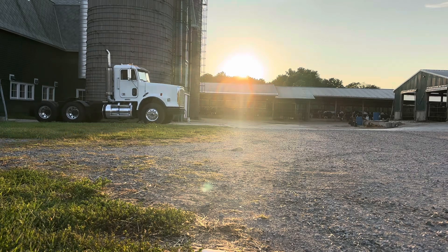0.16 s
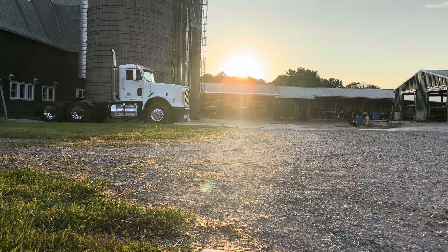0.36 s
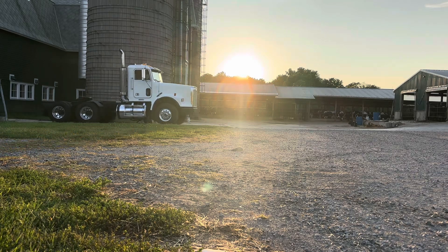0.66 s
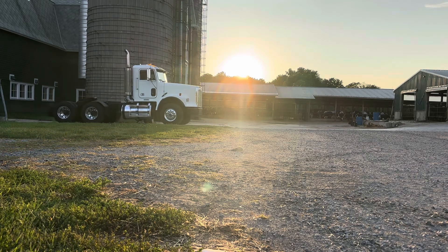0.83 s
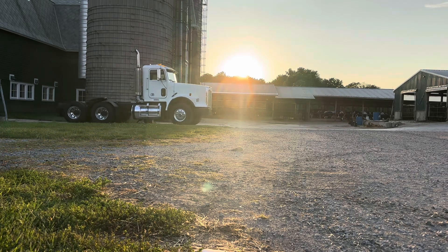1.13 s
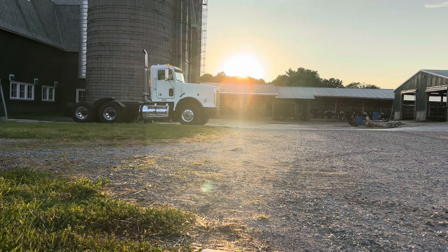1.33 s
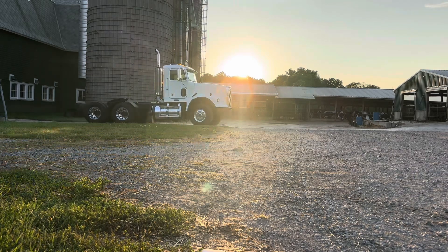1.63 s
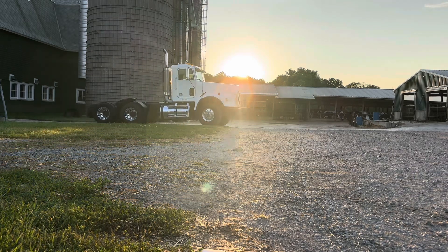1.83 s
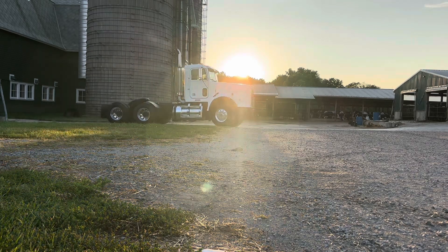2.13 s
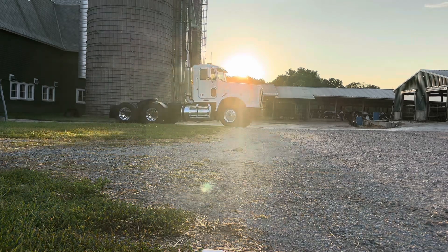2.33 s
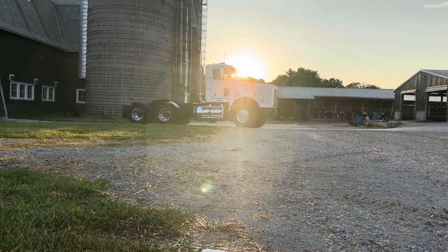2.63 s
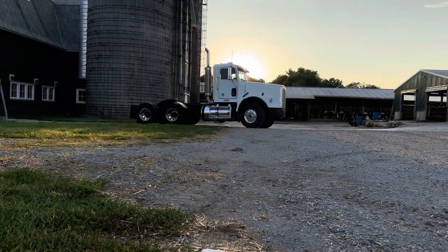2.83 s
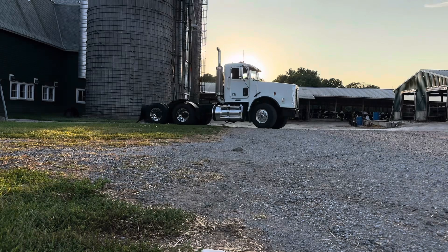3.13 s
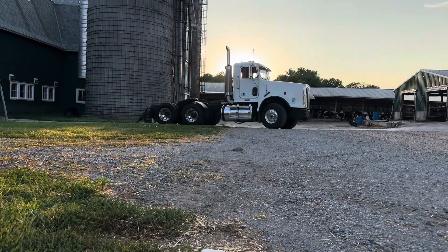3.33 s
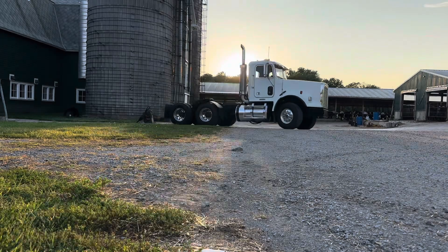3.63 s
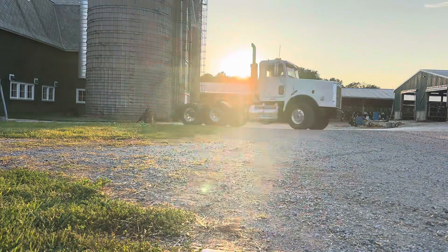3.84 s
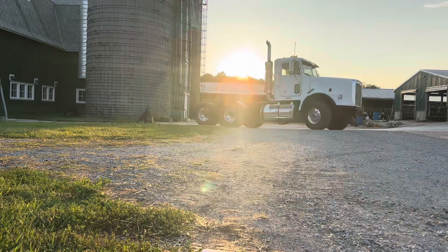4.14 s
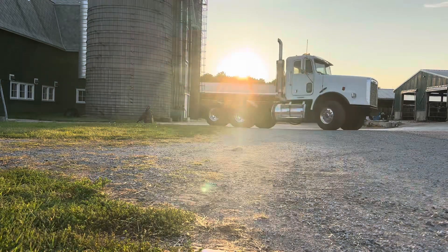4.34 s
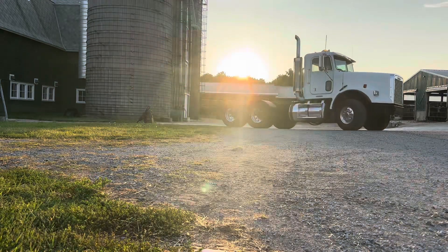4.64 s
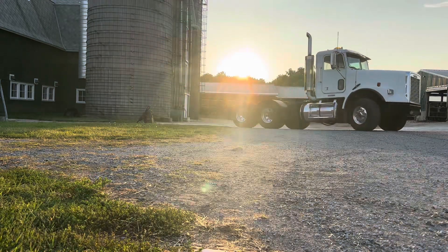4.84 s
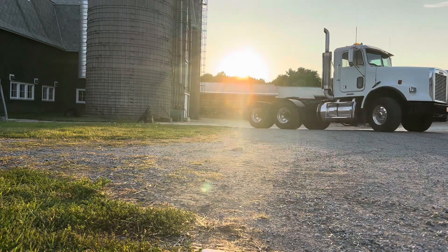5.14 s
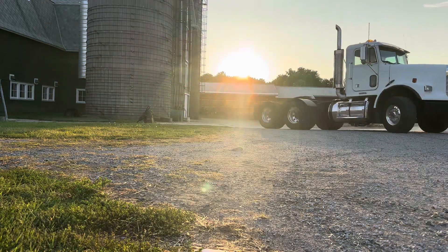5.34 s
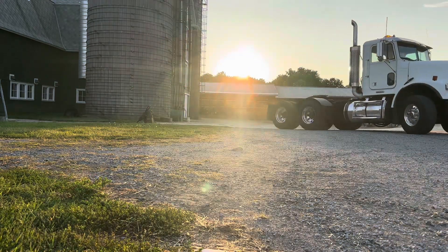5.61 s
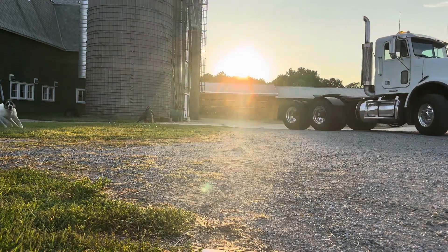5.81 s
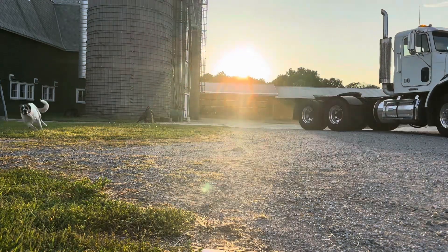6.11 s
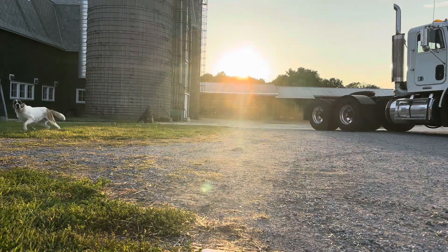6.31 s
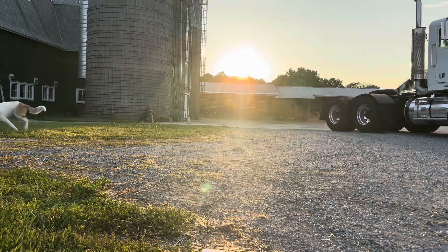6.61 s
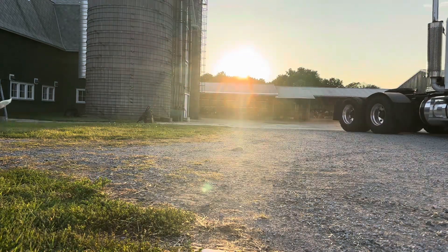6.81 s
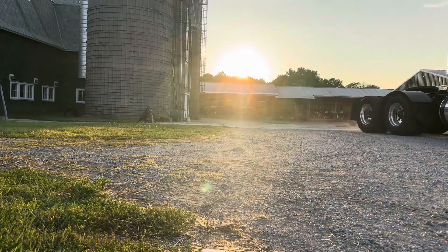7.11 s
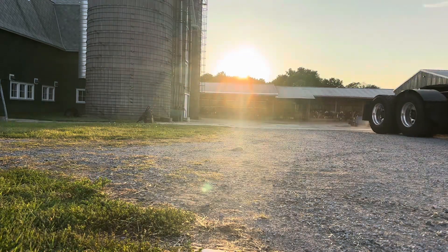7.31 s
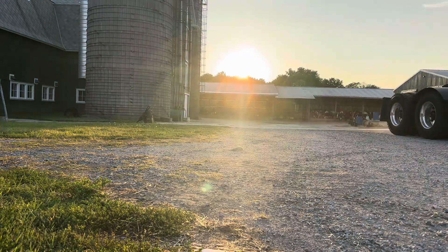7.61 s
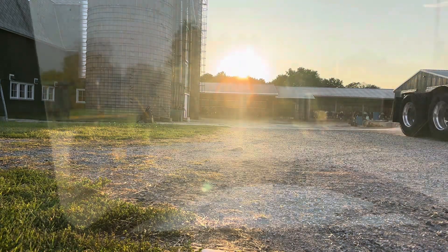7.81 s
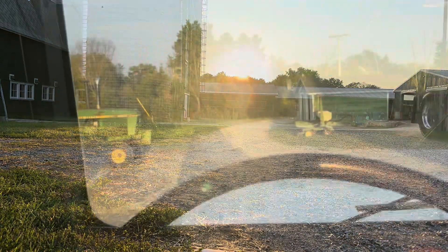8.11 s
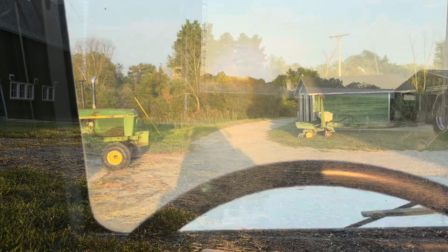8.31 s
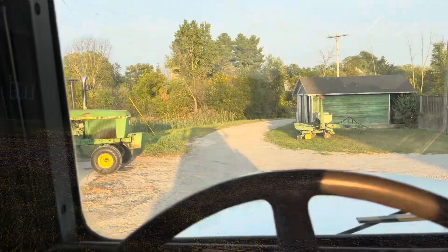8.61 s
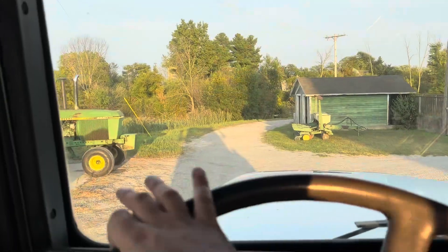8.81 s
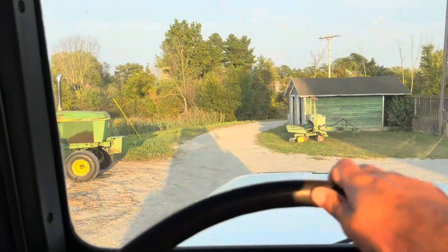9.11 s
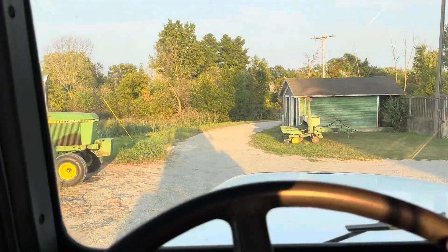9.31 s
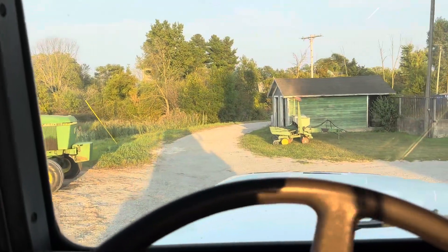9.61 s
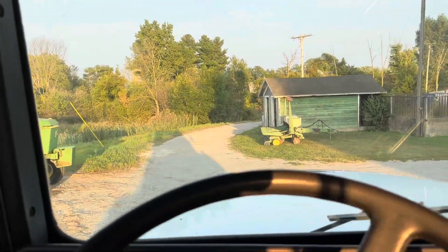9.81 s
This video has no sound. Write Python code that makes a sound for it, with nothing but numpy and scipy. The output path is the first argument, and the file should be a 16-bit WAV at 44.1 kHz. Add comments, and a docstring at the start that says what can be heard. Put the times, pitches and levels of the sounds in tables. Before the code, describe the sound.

A diesel truck accelerates across gravel between barns, engine clattering and exhaust ringing. Around two seconds it coasts briefly for a shift, the turbo whining downward, then power returns louder and the engine settles to a steady drone. Near eight seconds the yard blends into the muffled, boomy cab interior, where a linkage clacks, air hisses more strongly on the left, and the engine lopes before picking up speed. Two closely spaced microphones.

```python
"""A six-cylinder diesel truck pulls away across a gravel farmyard from left to right, changes gear once and
rolls on. The yard fades into the cab of the idling truck, where air hisses and the engine then picks up speed.
The engine is firing tones plus eight bands of noise, part of which repeats every engine cycle.
Whistles, ringing clacks and filtered hisses join it; two microphones a hand apart hear it,
with lag, level difference and decaying-noise echoes from barn walls and cab panels."""
import sys
import numpy as np
from scipy import signal
from scipy.fft import rfft, irfft, next_fast_len
from scipy.io import wavfile
from scipy.ndimage import uniform_filter1d, map_coordinates

SR = 44100
rng = np.random.default_rng(int(sys.argv[2]) if len(sys.argv) > 2 else 0)


def unload_audio(sound):
    """Save the sound as a 16-bit wav file, at the path given as the first command line argument."""
    columns = np.transpose(np.atleast_2d(sound))
    # keep every value between -1 and 1, then stretch to whole-number steps
    steps = np.round(np.clip(columns, -1, 1) * 32767)
    wavfile.write(sys.argv[1], SR, steps.astype(np.int16))


N = 438794
CYLINDERS = 6

# The eight shaken parts, low to high, are always listed in this order:
# rumble, exhaust bark, stack ring, block knock, valve clatter, rattle, rasp, hiss.

# engine speed heard from the yard: t/s, firing rate/Hz
YARD_SPEED_CURVE = [(0, 42), (.36, 44), (.84, 50.6), (1.17, 62.5), (1.46, 69), (1.82, 77.5), (1.92, 70.2),
                    (2.2, 59.9), (2.64, 42.2), (2.92, 51.9), (3.11, 57.9), (3.27, 58.6), (3.66, 67.1),
                    (4.09, 78), (4.55, 70.6), (4.81, 71), (5.2, 68.7), (5.96, 67.7), (6.82, 67.8),
                    (7.78, 70), (8.5, 71)]


def amp(db):
    """Turn decibels into a gain."""
    return 10 ** (np.asarray(db) / 20)


def rms_one(x):
    """Scale a sound so that its rms (average strength) is 1."""
    return x / np.sqrt(np.mean(x ** 2) + 1e-20)


def in_time(rows, span):
    """Draw straight lines between the rows of a table, giving each column a value at every sample of a span."""
    s, *columns = np.transpose(rows)
    return [np.interp(np.arange(*span) / SR, s, c) for c in columns]


def band(x, low_hz, high_hz, order=3):
    """Keep only the pitches between two edges (Butterworth band-pass)."""
    return signal.sosfilt(signal.butter(order, [low_hz, high_hz], "band", fs=SR, output="sos"), x)


def flicker(count, spread_db):
    """A gain that wanders randomly, mostly 1 to 19 times a second."""
    return amp(spread_db * rms_one(band(rng.standard_normal(count), 1.24, 19.0, order=2)))


def coloured(x, spectrum, modes):
    """Shape a sound with a smooth spectrum that has resonance peaks on top."""
    size = next_fast_len(x.shape[-1] + SR // 10)
    hz = np.maximum(np.arange(size // 2 + 1) * SR / size, 1)
    curve_hz, curve_db = np.array(spectrum).T
    db = np.interp(np.log(hz), np.log(curve_hz), curve_db)
    for top_hz, width, lift_db in modes:
        db = db + lift_db / (1 + (2 * (hz - top_hz) / width) ** 2)
    return irfft(rfft(x, size) * amp(db), size)[..., :x.shape[-1]]


def delayed(x, ms):
    """Play x later by a delay that may slide, reading between samples."""
    return map_coordinates(x, [np.arange(len(x)) - ms * SR / 1000], order=3, mode="nearest")


def cycle_pattern(cycles, life, line_db, size=4096):
    """Pressure that returns every engine cycle: steady lines, and a random part renewed over `life` cycles."""
    # multiples of the engine-cycle rate that have steady lines
    line_orders = [9, 10, 14, 16, 17, 20, 24, 33, 35, 39, 42, 48, 52, 57, 53, 64, 66, 72, 75, 78, 84, 87,
                   58, 61, 55, 62, 69]
    stroke_top_order = 24   # lines up to this multiple join in one hard stroke
    stroke_lead = .22       # share of a firing by which that stroke comes ahead of the first cylinder

    # random patterns without those lines; each blends into the next
    spectra = np.sqrt(size) * np.exp(2j * np.pi * rng.random((64, size // 2 + 1)))
    spectra[:, line_orders] = 0
    patterns = irfft(spectra)
    age = cycles / life
    old, turn = age.astype(int), np.pi / 2 * (age % 1)

    orders = np.array(line_orders)
    stroke_turns = .5 + orders * stroke_lead / CYLINDERS
    turns = np.where(orders <= stroke_top_order, stroke_turns, rng.random(len(orders)))
    lines = np.zeros(size // 2 + 1, complex)
    lines[line_orders] = np.sqrt(size) * amp(line_db) * np.exp(2j * np.pi * turns)

    at = (cycles % 1 * size).astype(int)
    fading = np.cos(turn) * patterns[old % 64, at]
    coming = np.sin(turn) * patterns[(old + 1) % 64, at]
    return irfft(lines)[at] + fading + coming


def engine(firing_hz, tone_db, part_db, flutter_db, repeat, colour, modes, line_db, life):
    """Each firing sounds tones at multiples of its rate and shakes eight parts, returned one to a row."""
    # edges between neighbouring parts: f/Hz
    part_edges = [30, 240, 520, 780, 1150, 2200, 3400, 5800, 17000]
    # how deeply each part swells with every firing: 0-1
    part_throb = [.1, .15, .2, .24, .24, .2, .16, .05]
    # no two cylinders hit alike: level/dB of each
    cylinder_db = [2, -1, 0, 1.5, -2, -.5]
    roughening = 6.0      # Hz per s; a change of speed this fast roughens the cycles halfway
    pull_flutter_db = 2.2   # extra wavering of the tones while the speed changes
    rev_repeat = .75      # share of the pattern that survives any change of speed

    pull = uniform_filter1d(np.gradient(firing_hz) * SR, round(.3 * SR))   # Hz per s
    steady = 1 / (1 + (pull / roughening) ** 2)
    flutter_db = flutter_db + pull_flutter_db * (1 - steady)
    firings = np.cumsum(firing_hz) / SR

    hum = 0
    for k, db in enumerate(tone_db):
        tone = np.sin(2 * np.pi * (k + 1) * firings + 1.03 * k)
        hum = hum + np.sqrt(2) * amp(db) * flicker(len(db), flutter_db) * tone

    pattern = cycle_pattern(firings / CYLINDERS, life, line_db)
    noise = rng.standard_normal(len(hum))
    alike, chance = coloured(np.array([pattern, noise]), colour, modes)

    strength = amp(cylinder_db)[firings.astype(int) % CYLINDERS]
    blow = strength * np.exp(-2.5 * (firings % 1))
    blow = uniform_filter1d(blow, round(SR / 400))   # pressure builds over a few ms
    blow = blow / blow.mean() - 1

    rows = []
    for k, db in enumerate(part_db):
        share = np.clip(repeat[k], 0, 1)
        if k > 0:   # the rumble keeps its pattern at any change of speed
            share = share * (rev_repeat + (1 - rev_repeat) * steady)
        mix = (np.sqrt(share) * alike + np.sqrt(1 - share) * chance) * (1 + part_throb[k] * blow)
        sos = signal.butter(2, part_edges[k:k + 2], "band", fs=SR, output="sos")
        rows.append(amp(db) * rms_one(signal.sosfiltfilt(sos, mix)))
    return hum, rows


def yard_engine(span):
    """Tones grow with speed and drop while the fuel is cut; each part blends five loudness curves."""
    # loudness curves, of which only the swing about the mean counts:
    # t/s, then level/dB of low mids, mids, high mids, low treble, treble
    yard_levels = [(0, -46.5, -45, -51.5, -58.5, -77), (.45, -42.5, -37.5, -46, -56, -70),
                   (1.07, -33, -37, -36.5, -52.5, -50.5), (1.5, -34, -31.5, -35.5, -47.5, -50),
                   (1.815, -27.5, -33, -36.5, -53, -48.5), (1.86, -32.5, -40.5, -53.5, -61.5, -65.5),
                   (2.1, -35.5, -45, -50.5, -59, -61.5), (2.582, -39, -53.5, -62.5, -67, -78.5),
                   (2.589, -43.5, -31, -49, -58, -74), (2.82, -41.5, -28, -44, -61.5, -69),
                   (2.98, -33, -25, -36, -56, -54), (3.72, -32.5, -21.5, -33.5, -50, -52.5),
                   (4.14, -31, -23.5, -30, -42, -46), (4.37, -29.5, -25.5, -37.5, -44.5, -54),
                   (4.42, -33.5, -26, -42, -48, -59), (5.33, -31.5, -23.5, -38.5, -46.5, -55),
                   (6.14, -29, -20.5, -31.5, -48, -44.5), (6.76, -30.5, -20.5, -32, -38.5, -43.5),
                   (7.81, -33, -23.5, -31, -31.5, -46), (8.3, -34.5, -21, -29.5, -31, -46)]
    # firing tone, its 2nd and 3rd multiple: level/dB at cruise, slope/dB per Hz, share of the low mids' swing
    tone_rules = [(-24, 0.35, 0.21), (-20, 0.28, 0.45), (-30, 0.45, 1)]
    # each part: mean level/dB, then its share of the swing of each of the five loudness curves
    part_rules = [(-28, 1, 0.0074, 0.19, 0.14, -0.47), (-30, 0.64, 0, 0.23, 0.25, -0.17),
                  (-28, 0.29, 0.73, -0.5, 0.15, 0.28), (-32, 0.16, 0.98, 0.34, 0.15, -0.28),
                  (-34.5, 0.37, 0.13, 0.88, 0.11, -0.45), (-41.5, 0.1, 0, -0.067, 0.022, 0.31),
                  (-47.5, 0.093, 0.12, -0.031, 0.83, -0.17), (-51, 0, 0.097, -0.25, 0.06, 0.5)]
    # the exhaust pipe favours some pitches: f/Hz, level/dB
    pipe = [(42, 1.5), (58, 4), (75, -2), (85, 0.5), (98, -5.5), (115, -5), (130, -2), (145, -2.5),
            (156, -8.5), (175, -6), (190, 1.5), (205, 3), (230, -2.5)]
    # change in level of the 3rd multiple, strongest near 3.7 s: t/s, level/dB
    third_tone = [(0, -4), (1.3, -1), (1.8, -5), (2.7, -3), (3.7, 1), (4.4, -1.5), (6, -1.5), (8.3, -6)]
    # drop of each tone while the fuel is cut: level/dB
    coast_loss = [15, 18, 14]
    # share of each part that comes back alike in every engine cycle: 0-1
    yard_repeat = [.85, .85, .9, .9, .4, .15, .08, 0]
    # balance of pitches within each part: f/Hz, level/dB per Hz
    yard_colour = [(30, -18.5), (60, -8.5), (130, -4), (220, -7), (310, -19.5), (600, -19), (950, -15),
                   (1150, -22), (1800, -30), (2400, -45), (4500, -45.5), (7000, -59), (10000, -60.5),
                   (13000, -67.5)]
    # resonances of the exhaust stack, then others heard in the yard: f/Hz, width/Hz, level/dB
    stack_modes = [(410, 70, 9), (646, 20, 10.5), (755, 19, -3), (890, 34, 5), (970, 38, 8), (1080, 24, 3)]
    yard_modes = [(323, 71, 0.5), (1660, 84, 3.5), (2320, 570, 6), (2937, 85, 2), (3600, 430, 4.5),
                  (4880, 1600, 5.5), (5890, 870, 6), (7680, 1600, 4.5)]
    # steady lines against their neighbours: level/dB
    yard_line_db = [3.2, 5.8, 1.1, 11.9, 1, 2.9, 10.1, 2.4, 6.5, 8.8, 10.2, 4.6, 5.5, 7.4, 3.1, 9.2, 11,
                    7.3, 9.8, 9.6, 6.6, 2.4, 8.1, 6, 2.2, 2.4, 7.4]
    fuel_off_s, fuel_on_s, fuel_edge_s = 1.8, 2.62, 0.026   # the gear change
    cruise_hz = 68       # firing rate
    coast_repeat = .3    # share of the repeating pattern left while the fuel is cut

    firing_hz, = in_time(YARD_SPEED_CURVE, span)
    levels = np.array(in_time(yard_levels, span))
    swing = levels - levels.mean(axis=1, keepdims=True)
    fuel_cut = [(fuel_off_s, 0), (fuel_off_s + fuel_edge_s, 1), (fuel_on_s, 1), (fuel_on_s + fuel_edge_s, 0)]
    coasting, = in_time(fuel_cut, span)

    tone_db = []
    for k, (db, slope, share) in enumerate(tone_rules):
        level = db + slope * (firing_hz - cruise_hz) + share * swing[0] - coast_loss[k] * coasting
        tone_db.append(level + np.interp((k + 1) * firing_hz, *np.transpose(pipe)))
    tone_db[2] = tone_db[2] + in_time(third_tone, span)[0]

    part_db = [db + np.dot(shares, swing) for db, *shares in part_rules]
    repeat = np.outer(yard_repeat, 1 - (1 - coast_repeat) * coasting)
    return engine(firing_hz, tone_db, part_db, 0.06, repeat,
                  yard_colour, stack_modes + yard_modes, yard_line_db, life=16.03)


def turning(rows, span):
    """As the truck turns, each resonance comes forward or drops back along its curve, and flickers a little."""
    # resonances: f/Hz, width/Hz
    ring_hz = [(410, 60), (480, 80), (650, 36), (890, 50), (972, 50), (1690, 90), (2450, 500)]
    # gain of each resonance: t/s, then level/dB of each in turn
    ring_levels = [(0, -4, -5, 2, 1.5, -7, 2.5, -0.5), (1, -1, -3, -9, 5, 1, 2, 1.5),
                   (1.7, 1, -1, -1, -4, 2, 0, 0), (2.2, -5, 2.5, -13, 8, 1, -14, -4.5),
                   (2.6, -2, 0.5, -1, 3, 4, -6, -3), (3.3, -4.5, 0, -6.5, 4, -3, -7, -2.7),
                   (3.8, 4, -0.5, 1.5, 1, -2.5, -3, -4), (4.2, 6.5, -8, 1, -4, -2, -4.5, -5),
                   (4.7, 0.5, 4.5, -9.5, -8, 4, 0, -3.5), (5.1, -2.5, 4, -6, -6, 0, -2, -2),
                   (5.5, -0.5, -2.5, -9, -10, -0.5, 0, -1), (6, -1, 3, -5.5, -3.5, -2, 0.5, 0),
                   (6.6, -1.5, -1.5, 0.5, 5, -5, -4, 4.5), (7, -11, 1.5, 0.5, 5.5, -15, -2, 4),
                   (7.5, -4.5, 3, 3, 2.5, -3, 5, 6), (8.3, -1.5, 3.5, 1, -3, 4, 3.5, 4.5)]
    rows = np.array(rows)
    for (hz, width), db in zip(ring_hz, in_time(ring_levels, span)):
        ring = signal.lfilter(*signal.iirpeak(hz, hz / width, fs=SR), rows)
        rows = rows + (amp(db) * flicker(len(db), .7) - 1) * ring
    return list(rows)


def turbo(span):
    """The coasting turbo: whistles that fall together, wavering under quick random swells."""
    # main whistle: t/s, f/Hz, level/dB before the swells and the lift of each whistle
    whine = [(1.82, 4450, -62), (1.9, 4420, -46), (2.25, 4350, -47), (2.4, 4230, -53), (2.6, 4100, -57),
             (2.7, 4050, -75)]
    # whistles sounding together: pitch ratio to the main one, lift/dB
    partners = [(1, 1.5), (.7, 2), (.457, 4)]
    hz, db = in_time(whine, span)
    turns, out = np.cumsum(hz) / SR, 0
    for ratio, lift_db in partners:
        wander = rms_one(band(rng.standard_normal(len(hz)), 15, 60, order=1))
        swell = .4 + .85 * wander   # steady share, then wavering share
        out = out + amp(db + lift_db) * swell * np.sin(2 * np.pi * ratio * turns)
    return out


def knock(span):
    """Metal rings at each firing while the engine pulls: puffs of noise through two narrow bands."""
    # ringing bands: low edge f/Hz, high edge f/Hz
    knock_bands = [(2850, 3400), (3650, 4250)]
    # loudness: t/s, level/dB
    knock_level = [(0, -58), (.9, -42.5), (1.8, -42), (1.86, -63), (2.75, -52), (2.95, -44), (3.3, -39),
                   (4.2, -43), (4.45, -57)]
    decay, spread_db = 2.2, 2.2   # decay per firing; change from firing to firing
    firings = np.cumsum(in_time(YARD_SPEED_CURVE, span)[0]) / SR
    strength = amp(spread_db * rng.standard_normal(int(firings[-1]) + 1))[firings.astype(int)]
    swell = uniform_filter1d(strength * np.exp(-decay * (firings % 1)), round(SR / 300))
    ringing = sum(band(swell * rng.standard_normal(len(swell)), *edges, order=2) for edges in knock_bands)
    return amp(in_time(knock_level, span)[0]) * rms_one(ringing)


def scattered(hiss):
    """The hiss comes off many surfaces: no lag, and only partly alike on the two sides."""
    alike = .2   # 1 would make both sides the same
    other = np.roll(hiss, round(0.017 * SR))   # a shifted copy stands in for a second hiss
    both = np.sqrt(1 + alike) * hiss + np.sqrt(1 - alike) * other * np.array([[1], [-1]])
    return both * flicker(len(hiss), .9)


def heard(hum, rows, low_lag_ms, high_lag_ms, pan_db, echo_db, t60):
    """Direct sound has a lag and a level difference between the sides; echoes differ on each side."""
    # how much of the left-right level difference each part below the hiss shows: factor
    part_pan = [0.054, 0.26, 0.61, 0.6, 1.18, 0.45, -0.44]
    # lag of each part below the hiss: 1 = the lag of the lows, 0 = that of the treble
    part_lag = [1, 1, 1, .92, .8, 0, 0]
    s = np.arange(round(t60 * SR)) / SR
    tails = rng.standard_normal((2, len(s))) * amp(-60 * s / t60)
    spectra = rfft(tails)
    tails = irfft(spectra / uniform_filter1d(abs(spectra), size=5), len(s))   # many small echoes favour no pitch

    out = []
    for tail, side in zip(tails, (.5, -.5)):   # left, right
        direct = far = 0
        for k, x in enumerate([hum + rows[0], *rows[1:-1]]):
            x = x * amp(side * part_pan[k] * pan_db) / np.sqrt(1 + amp(echo_db[k]) ** 2)
            lag_ms = high_lag_ms + part_lag[k] * (low_lag_ms - high_lag_ms)
            direct = direct + delayed(x, side * lag_ms)
            far = far + x * amp(echo_db[k])
        echo = signal.fftconvolve(far, tail / np.sqrt(np.sum(tail ** 2)))[:len(far)]
        out.append(direct + echo)
    return np.array(out) + scattered(rows[-1])


def clacks():
    """Linkage clacks: a short burst of random contacts makes the linkage ring at its own pitches."""
    # each clack: t/s, strength/dB, extra brightness/dB per octave, share of the ring time
    clack_rows = [(2.138, -31.5, -6, .35), (8.4468, -24.5, 2, 0.88)]
    # ringing pitches: f/Hz, level/dB before the brightness, full ring time to -60 dB/s
    clack_modes = [(900, -9, .012), (1600, -2, .01), (2050, 2, .012), (2300, -4, .008), (2650, -8, .008),
                   (3100, -11, .009), (4200, -19, .007), (5800, -17, .006), (7500, -17, .006)]
    out, burst = np.zeros(N), np.arange(round(.08 * SR))
    for s, strength_db, tilt_db, ringing in clack_rows:
        kicks = amp(strength_db - 20.5) * np.exp(-burst / SR / 0.016) * rng.standard_normal(len(burst))
        for hz, db, t60 in clack_modes:
            r, w = amp(-60 / (ringing * t60 * SR)), 2 * np.pi * hz / SR
            gain = amp(db + tilt_db * np.log2(hz / 2200))
            resonator = [0, gain * np.sin(w)], [1, -2 * r * np.cos(w), r * r]
            out[round(s * SR) + burst] += signal.lfilter(*resonator, kicks)
    return band(out + 1e-18, 640, 16000, order=1)


def air_leak():
    """Air escaping from a leak: smooth, very high noise that flickers."""
    # loudness: t/s, level/dB
    leak_level = [(0, -80), (1.55, -57), (2.52, -67), (3.05, -54), (4.27, -50), (4.52, -54), (6.5, -58),
                  (7.7, -60), (8.35, -41.5), (9.1, -42), (9.95, -51)]
    hz, width = 16700, 2400   # middle and width of the band, Hz
    level, wander = amp(in_time(leak_level, (0, N))[0]), flicker(N, 1.4)
    return level * wander * rms_one(band(rng.standard_normal(N), hz - width / 2, hz + width / 2, order=1))


def cab_engine(span):
    """Tones and parts move away from their idle levels as the pedal goes down."""
    # engine speed: t/s, firing rate/Hz
    cab_speed = [(8.5, 43.4), (9.41, 43.4), (9.714, 48.6), (9.842, 48.8), (9.91, 50.6), (9.95, 47)]
    # pedal: t/s, position (0 idle - 1 pressed)
    cab_pedal = [(8.6, 0.07), (9.4, 0.39), (9.62, 0.84), (9.95, 0.85)]
    # firing tone, its 2nd and 3rd multiple: level/dB at idle, gain with the pedal/dB
    tone_rules = [(-28.5, -1), (-27.5, 2), (-26, -2.5)]
    # each part: level/dB at idle, gain with the pedal/dB
    part_rules = [(-24, -4), (-38.5, 10.5), (-37, 14.5), (-37.5, 15), (-45, 14.5), (-53, 6.5), (-59, 11.5),
                  (-50, -1.5)]
    # share of each part that comes back alike in every engine cycle: 0-1
    cab_repeat = [.7, .3, .5, .7, .6, .05, 0, 0]
    # balance of pitches within each part: f/Hz, level/dB per Hz
    cab_colour = [(30, -21), (50, -10.5), (96, 0), (139, -11), (190, -12), (235, -24.5), (330, -33.5),
                  (420, -30.5), (600, -26), (950, -24), (1400, -34), (2400, -43), (4000, -46), (10000, -49),
                  (13000, -46)]
    # resonances heard in the cab: f/Hz, width/Hz, level/dB
    cab_modes = [(560, 60, 0), (932, 56, 9.5), (3700, 400, 8.5), (5620, 150, 2)]
    # steady lines against their neighbours: level/dB
    cab_line_db = [2, 8, 8, 1, 5, -8, 9, -4, 5, 4, 8, 3, 7, -1, -4, -2, 2, -4, 0, 1, 5, 5, 2, -3, -3, 0, -3]
    firing_hz, = in_time(cab_speed, span)
    pedal, = in_time(cab_pedal, span)
    tone_db = [db + lift_db * pedal for db, lift_db in tone_rules]
    part_db = [db + lift_db * pedal for db, lift_db in part_rules]
    return engine(firing_hz, tone_db, part_db, .6, cab_repeat, cab_colour, cab_modes, cab_line_db, life=2.87)


def left_hiss(count):
    """A flickering band of noise in the cab, much louder on the left."""
    left_db, pan_db = -46, 31   # level on the left; how much weaker the right is
    hiss = flicker(count, 1.5) * rms_one(band(rng.standard_normal(count), 4500, 6470, order=2))
    return hiss * amp([[left_db], [left_db - pan_db]])


def scene():
    """The yard fades out while the cab fades in."""
    # place of the truck: t/s, lag of left behind right in the lows/ms, the same in the treble/ms,
    # left minus right level/dB
    yard_place = [(0, -0.22, -0.15, -0.5), (1.5, -0.15, -0.12, -2), (2.7, 0.063, -0.074, -3.5),
                  (3.9, 0.11, -0.024, -5), (5.1, 0.19, 0.053, -8), (6.3, 0.44, 0.13, -9.5),
                  (7.5, 0.53, 0.16, -7), (8.3, 0.52, 0.14, -5.5)]
    # barn echo level in the yard, rising and falling: t/s, level/dB
    yard_echo = [(0, -9.5), (2.5, 1.5), (2.65, -9), (5, 3.5), (7, -19)]
    # yard echo of each part below the hiss against its direct sound: level/dB, share of the barn echo curve
    yard_part_echo = [(-14.5, 0.34), (-4, 0.65), (-1.5, 1.2), (2.5, 1.52), (-4.5, 0.09), (-6.5, 0.0057),
                      (4, 0.076)]
    # cab echo of each part below the hiss against its direct sound: level/dB
    cab_echo = [-15, 3, 3, -1.5, 5, 8, 8]
    # the idle lopes in the bass: t/s, level/dB
    cab_lope = [(7.7, -7), (8.6, -2.5), (8.72, -3), (8.82, 3), (8.92, -1), (9.0, -2), (9.15, -2), (9.45, 2),
                (9.6, 3.5), (9.95, 3.5)]
    # fade: t/s, position (0 yard - 1 cab)
    crossfade = [(7.7, 0.23), (7.9, 0.58), (8.7, 0.96), (8.8, 0.95)]
    yard_span, cab_span = (0, round(8.8 * SR)), (round(7.7 * SR), N)
    cab_lag_ms, cab_pan_db = 0.45, 2
    out = np.zeros((2, N))

    hum, rows = yard_engine(yard_span)
    rows[1:6] = turning(rows[1:6], yard_span)
    rows[5] = rows[5] + turbo(yard_span) + knock(yard_span)   # these share the rattle's place and echo
    barn_db, = in_time(yard_echo, yard_span)
    echo_db = [db + share * barn_db for db, share in yard_part_echo]
    yard = heard(hum, rows, *in_time(yard_place, yard_span), echo_db, t60=.2)
    out[:, slice(*yard_span)] += yard * np.minimum(2 - 2 * in_time(crossfade, yard_span)[0], 1)

    hum, rows = cab_engine(cab_span)
    lope = amp(in_time(cab_lope, cab_span)[0])
    hum, rows[0] = lope * hum, lope * rows[0]
    cab = heard(hum, rows, cab_lag_ms, cab_lag_ms, cab_pan_db, cab_echo, t60=.2)
    cab = cab + left_hiss(len(hum))
    out[:, slice(*cab_span)] += cab * in_time(crossfade, cab_span)[0]
    return out + clacks() * amp([[1.5], [-1.5]]) + air_leak()


def record(dry):
    """Peaks are rounded. Near 11 kHz the two sides are opposite, above 13 kHz alike; the top is cut."""
    # colour of left minus right: f/Hz, level/dB
    side_colour = [(20, -2.5), (6500, 1), (8500, -3.5), (10800, 3), (12500, 9), (20000, -14)]
    fade_in = np.minimum(np.arange(N) / SR / .01, 1)   # over 0.01 s
    dry = 1.3 * np.tanh(dry / 1.3) * fade_in
    mid, side = (dry[0] + dry[1]) / 2, (dry[0] - dry[1]) / 2
    mid = signal.sosfilt(signal.cheby2(8, 50, [10500, 12500], "stop", fs=SR, output="sos"), mid)
    side = coloured(side, side_colour, [])
    side = signal.sosfilt(signal.cheby2(8, 40, 13500, fs=SR, output="sos"), side)
    top_cut = signal.cheby2(14, 70, 16050, fs=SR, output="sos")
    return signal.sosfilt(top_cut, [mid + side, mid - side])


dry = scene()
out = record(dry)
unload_audio(out)
```